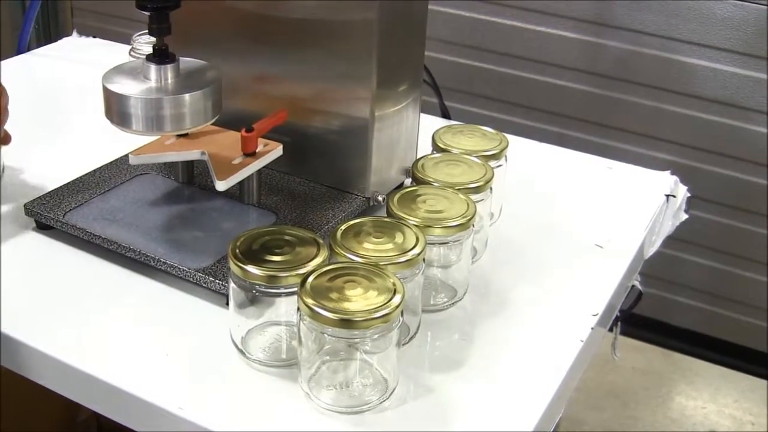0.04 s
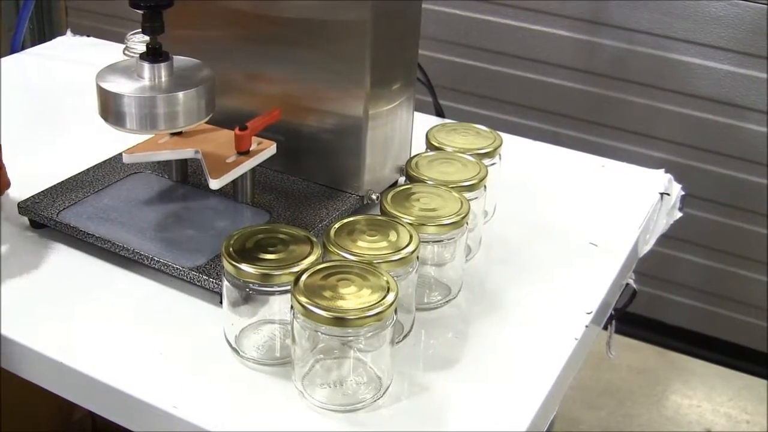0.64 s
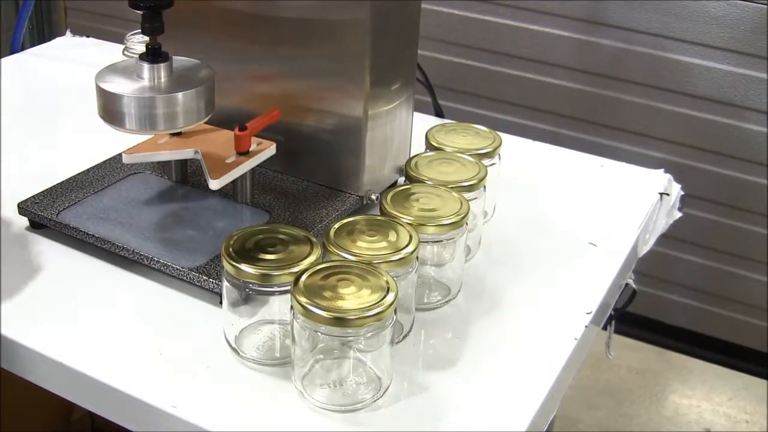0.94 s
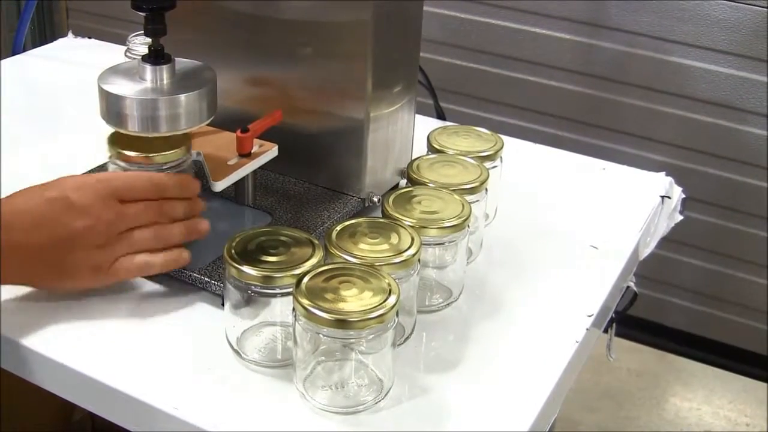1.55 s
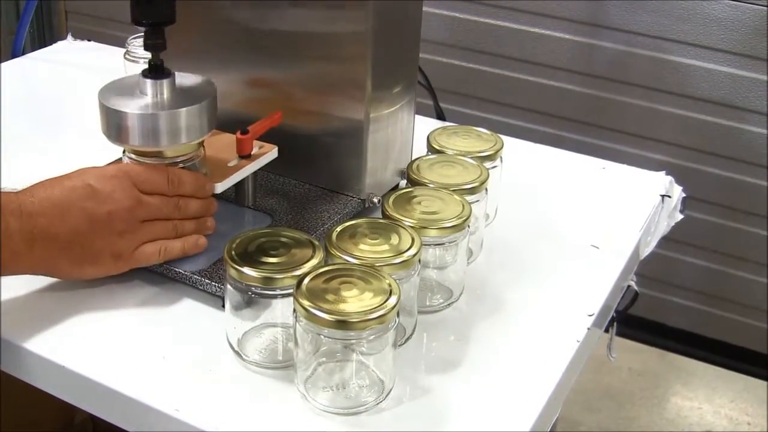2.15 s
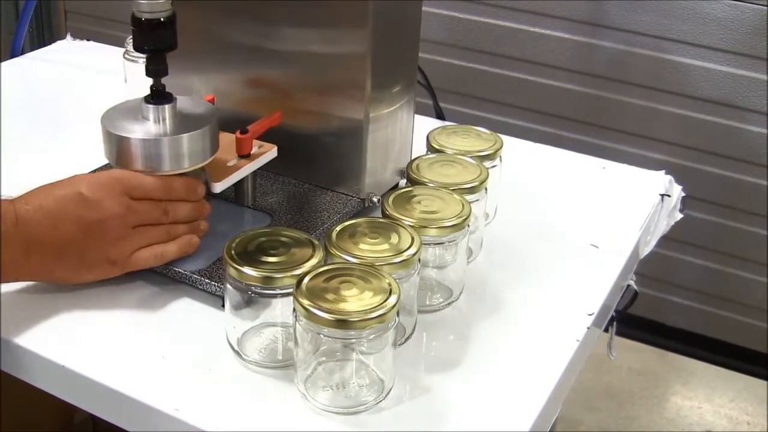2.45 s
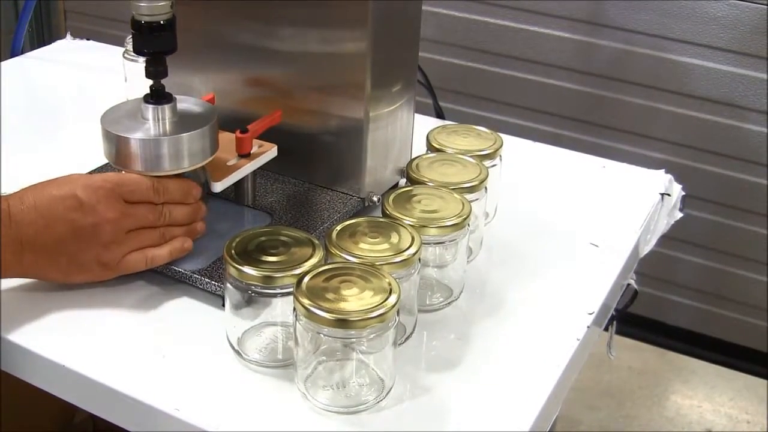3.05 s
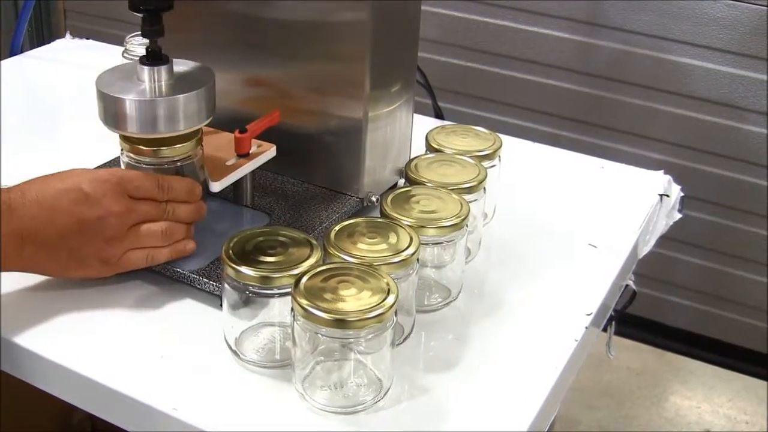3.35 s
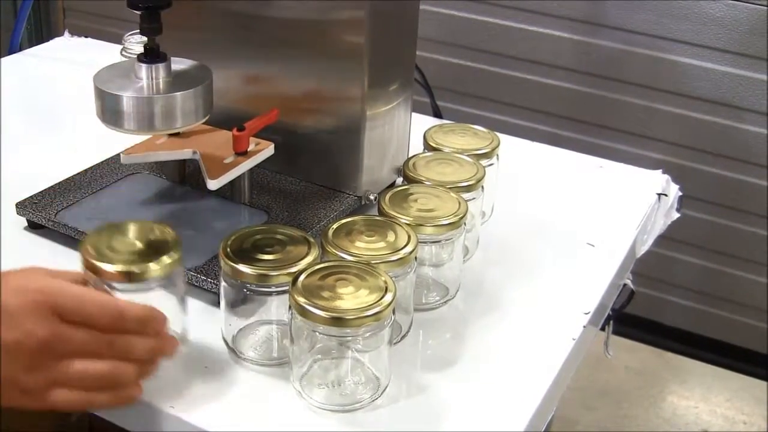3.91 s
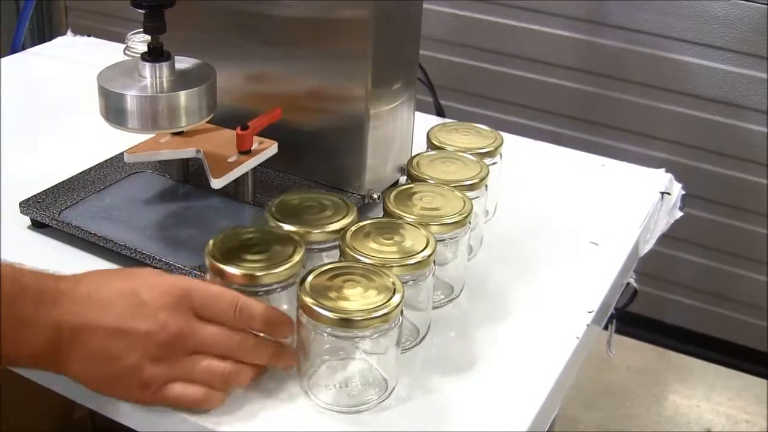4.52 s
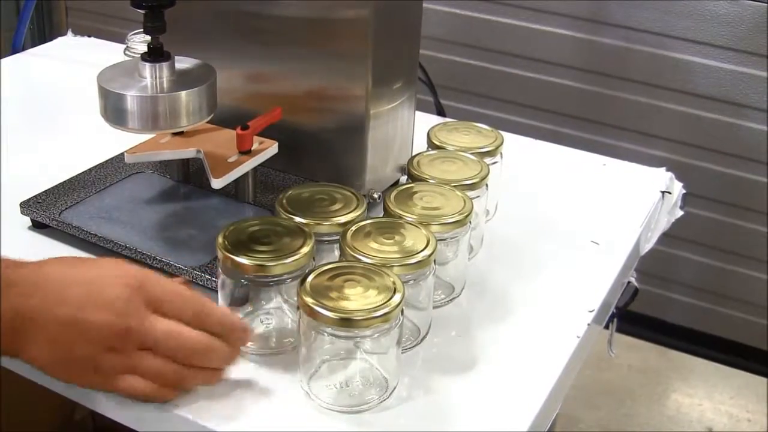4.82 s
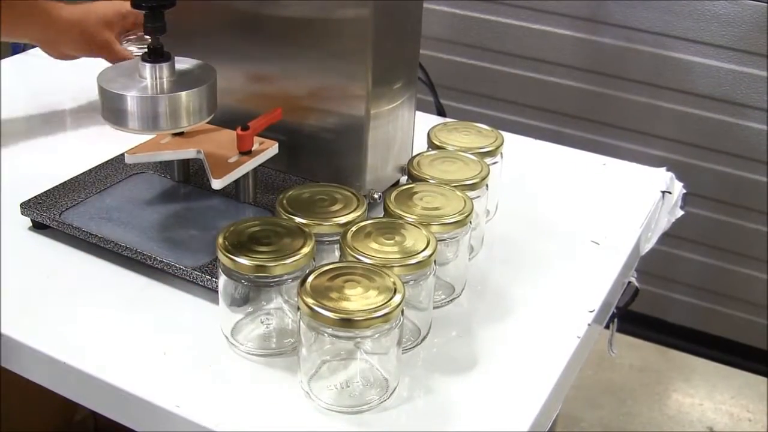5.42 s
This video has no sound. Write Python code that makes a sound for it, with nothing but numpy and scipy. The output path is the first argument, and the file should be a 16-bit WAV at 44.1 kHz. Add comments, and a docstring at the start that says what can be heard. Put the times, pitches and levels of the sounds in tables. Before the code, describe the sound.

Workshop ventilation hums softly throughout. In the first 0.6 seconds a metal lid taps lightly on a glass jar. At 1.5 seconds the jar bumps a ringing guide plate, and a capping machine's head clacks down. At 1.8 seconds a sharp tick and a brief metallic boom start the motor, which rises quickly to a high, hissing whine. Its pitch sags and it stalls with another boom around 2.4 seconds. From 2.5 to 3 seconds the slipping clutch makes a loud, fast, buzzing rattle. The head lifts with clacks around 3.2 seconds, followed by faint springy ticks and a ringing bump at 3.7 seconds. From 4.1 to 4.5 seconds the jar clinks onto the table and slides against other jars. One faint tap comes near 5.5 seconds. The machine and jar sound close and centred, with a short room echo.

```python
"""A tabletop capping machine: its motor whines up and bogs down as a jar's lid tightens, then its slip
clutch rattles until the head lifts with a clack. The steel column booms at start and stall.
Beforehand the glass jar is pushed against the guide and the chuck comes down on its lid. Afterwards
it is pulled out, set on the table and slid up to the others. Workshop ventilation hums behind."""
import sys
import numpy as np
from scipy import signal
from scipy.fft import rfft, irfft, next_fast_len
from scipy.io import wavfile
from scipy.ndimage import map_coordinates

SR = 44100
rng = np.random.default_rng(int(sys.argv[2]) if len(sys.argv) > 2 else 0)


def inscribe(sig):
    """Save sig as 16-bit PCM at rate SR to the path in sys.argv[1].

    A 1-D sig is mono; a 2-D sig holds one channel per row.
    Samples are clipped to [-1, 1] before scaling.
    """
    pcm = np.round(np.clip(np.atleast_2d(sig).T, -1, 1) * 32767)
    wavfile.write(sys.argv[1], SR, pcm.astype(np.int16))


N = 245637
TIME_S = np.arange(N) / SR
MOTOR_START_S, SLIP_START_S, SLIP_END_S = 1.79, 2.5222, 3.02

# Glass jar modes. Each row: frequency in Hz, relative level in dB, t60 in seconds.
JAR_MODES = [(555, -4.5, 0.086), (1080, -16, 0.098), (1240, -2, 0.073), (1570, 1.5, 0.063),
             (1760, -3, 0.068), (2050, -16, 0.082), (4700, -15, .04), (5770, -11, 0.035),
             (8030, -16, 0.038), (8150, -19, 0.035), (10800, -20, 0.025)]


def amp(db):
    """Decibels to gain."""
    return 10 ** (np.asarray(db) / 20)


def unit(x):
    """Scale to rms 1."""
    return x / np.sqrt(np.mean(x ** 2) + 1e-20)


def along(points, hz):
    """(Hz, value) points read on a log axis."""
    knots_hz, values = np.transpose(points)
    return np.interp(np.log(hz + 1), np.log(knots_hz + 1), values)


def wobble(rate_hz):
    """Smooth random curve, rate_hz knots a second."""
    knots = rng.standard_normal(int(N * rate_hz / SR) + 4)
    return map_coordinates(knots, [TIME_S * rate_hz])


def coloured(x, spectrum, size=4096):
    """Minimum-phase filter with a (Hz, dB) spectrum."""
    cepstrum = irfft(np.log(amp(along(spectrum, np.fft.rfftfreq(size, 1 / SR)))))
    cepstrum[1:size // 2] *= 2
    cepstrum[size // 2 + 1:] = 0
    return signal.fftconvolve(x, irfft(np.exp(rfft(cepstrum))))[:len(x)]


def noise(spectrum):
    """Coloured noise of rms 1."""
    return unit(coloured(rng.standard_normal(N), spectrum))


def tone(hz):
    """Sine of rms 1 on a pitch curve."""
    return np.sqrt(2) * np.sin(2 * np.pi * (np.cumsum(hz) / SR + rng.random()))


def fading(t, t60_s):
    """Exponential decay."""
    return np.exp(-np.log(1000) * t / t60_s)


def step(centre_s, ramp_s):
    """Smooth rise from 0 to 1."""
    return .5 + .5 * np.tanh((TIME_S - centre_s) / (2 * ramp_s))


def envelope(start_s, attack_s, hold_s, t60_s):
    """Linear attack; decay begins hold_s after the start."""
    t = TIME_S - start_s
    return np.clip(t / attack_s, 0, 1) * fading(np.maximum(t - hold_s, 0), t60_s)


def ringing(modes, t, scatter_db):
    """Damped modes of scattered strength and alternating sign."""
    return sum((-1) ** k * amp(db - scatter_db * rng.normal()) * fading(t, t60_s)
               * np.sin(2 * np.pi * hz * t) for k, (hz, db, t60_s) in enumerate(modes))


def add(track, start_s, sound):
    """Mix a sound into a track."""
    start = max(round(start_s * SR), 0)
    track[start:start + len(sound)] += sound[:N - start]


def blows(hits, colour, modes, crack_db, ring_db, knock_db, bright_db, ring_t60_s):
    """Each contact is a sharp crack and a dense clatter that leaves the object's modes ringing."""
    # Each hit: start in seconds, relative level, knock and brightness in dB, clatter t60 in seconds.
    # Each colour row: frequency in Hz, gain in dB.
    # Each mode: frequency in Hz, relative level in dB, t60 in seconds.
    track, t = np.zeros(N), np.arange(SR // 2) / SR
    for start_s, db, knock, bright, t60_s in hits:
        decay = fading(t, max(t60_s, .01)) + amp(crack_db) * fading(t, .0021)
        clatter = coloured(rng.standard_normal(len(t)) * decay, colour)
        ring = ringing(modes, t, scatter_db=3) * fading(t, ring_t60_s)
        low_db, high_db = knock + knock_db, bright + bright_db
        hardness = [(40, low_db - 15), (140, low_db), (450, low_db), (900, 0), (2500, 0), (7000, high_db)]
        strike = clatter / np.linalg.norm(clatter) + amp(ring_db) * ring / np.linalg.norm(ring)
        blow = coloured(strike, hardness)
        add(track, start_s, amp(db) * blow / np.std(blow[:SR // 100]))
    return track


def ventilation():
    """Steady air with wavering fan lines; the noise level ducks briefly, as under a gain control."""
    # Air spectrum and fan lines. Each row: frequency in Hz, relative level in dB.
    air_colour = [(15, -21), (25, -36), (96, -22.5), (152, -9), (188, -10.5), (221, -16.5), (289, -7),
                  (331, -12.5), (433, -10), (469, -12), (648, -9.5), (762, -11.5), (970, -11.5),
                  (3340, -25), (15500, -58)]
    fan_lines = [(236.9, -47), (290.7, -45), (441.4, -44.5), (581.4, -49), (1319, -54)]
    duck_db = -4 * np.exp(-((TIME_S - 3.74) / .16) ** 2)  # after the loud machine
    level = amp(-37.5 + duck_db + .45 * wobble(9.5))
    fan = sum(amp(db - 4.5 + 2.5 * wobble(3.875)) * tone(hz + 1.46 * wobble(5.3)) for hz, db in fan_lines)
    mid = level * noise(air_colour) + fan
    side = amp(-13.5) * level * noise(air_colour)
    return np.array([mid + side, mid - side])


def room(x):
    """Workshop echo; the treble dies first."""
    # Each row: frequency in Hz, t60 in seconds.
    decay_times = [(150, 0.33), (1000, 0.62), (4000, 0.37), (12000, 0.22)]
    hz, t, spectra = signal.stft(rng.standard_normal(SR), SR, nperseg=256)
    tail = signal.istft(spectra * fading(t, along(decay_times, hz)[:, None]), SR, nperseg=256)[1]
    return signal.fftconvolve(x, np.pad(tail, (SR // 200, 0)) / np.linalg.norm(tail))[:N]


def ticks():
    """Metallic ticks: one at the switch, then a springy train, weak and strong by turns."""
    # Switch tick: start in seconds, peak in dB, pitch in Hz.
    switch = (1.7794, -11.5, 11560)
    train_start_s, period_s, train_db, train_hz = 3.396, .061, -34.5, 8080
    train = [(train_start_s + k * period_s, train_db - (-1) ** k + 2 * rng.normal(), train_hz)
             for k in range(8)]
    track, t = np.zeros(N), np.arange(SR // 10) / SR
    for start_s, db, hz in [switch] + train:
        resonance = [(hz / 20, -50), (hz / 5, -6), (hz * .26, -28), (hz * .95, -20),
                     (hz, 0), (hz * 1.03, -20), (hz * 1.1, -28), (hz * 2, -55)]
        tick = coloured(rng.standard_normal(len(t)) * fading(t, .01), resonance)
        add(track, start_s, amp(db) * tick / np.abs(tick).max())
    return track


def lid_taps():
    """Jar and lid are handled at the table's edge; the lid rings."""
    # Columns as in blows().
    hits = [(0.038, -10.5, -15, -4, 0.047), (0.047, -6, -1.5, -10, 0.032), (0.054, -3.5, 0, -3, 0.036),
            (0.061, -6, -10, -18, 0.02), (0.082, -13, -7, -9, 0.032), (0.303, -2.5, -7, -21, 0.028),
            (0.309, -9, -2.5, -6, 0.037), (0.456, -18.5, -1.5, -22, 0.27), (0.530, -16.5, -11.5, -11, 0.11),
            (0.556, -17.5, -9.5, -21, 0.049), (0.607, -27.5, -33, -12.5, 0.019),
            (5.477, -23.5, -31, -16, 0.55)]
    colour = [(88, -40), (150, -27), (477, 0.5), (1320, -11), (1950, -19), (2270, -19.5), (2750, -22),
              (3400, -15.5), (6680, -35.5), (8410, -39), (11500, -35.5), (15000, -59)]
    modes = [(461, 5, 0.075), (848, 0, 0.045), (1275, -6.5, 0.1), (2267, -3, 0.096), (3480, -4, 0.14),
             (4000, -8.5, 0.054), (7200, -14, 0.022), (8300, -9.5, 0.028)]
    return blows(hits, colour, modes, crack_db=-13, ring_db=-4.5,
                 knock_db=9.5, bright_db=16, ring_t60_s=.48)


def guide_bumps():
    """The jar bumps the guide plate, which rings."""
    # Columns as in blows().
    hits = [(1.475, -12, -9, -17, 0.066), (1.483, -16.5, -33, -22, 0.081), (1.501, -9, -8.5, -20.5, 0.039),
            (3.718, -18, -12, -58, 0.091), (3.740, -5, -21.5, -27, 0.1), (3.764, -8, -21, -42, .09)]
    colour = [(88, -47), (150, -19.5), (649, -13.5), (818, -3), (1130, -20), (1730, -13.5), (2550, -24.5),
              (3400, -23.5), (3750, -34), (10800, -49), (15000, -60)]
    modes = [(587, -5.5, 0.13), (812.7, 6, 0.33), (1088, -10, 0.19), (1610, -25, 0.28), (1736, -8.5, 0.55),
             (1790, -18.5, 0.59), (2022, -16, 0.23), (3500, -13, 0.071)]
    return blows(hits, colour, modes, crack_db=-33, ring_db=1, knock_db=15, bright_db=23, ring_t60_s=1.2)


def jar_clinks():
    """The glass strikes the table and the other jars."""
    # Columns as in blows().
    hits = [(4.066, -1, -8, -24.5, 0.097), (4.087, -6.5, -14, -35, 0.11), (4.1115, -2, -22, -15.5, 0.028),
            (4.136, -8.5, -11, -19, .04), (4.1578, -3.5, -27, -18, 0.041), (4.171, -4.5, -25, -22, 0.025),
            (4.273, -0.5, -19, -25, 0.022), (4.2795, -2, -18, -15, 0.064), (4.29, -9, -24, -24, 0.032),
            (4.2975, -5, -23.5, -13, 0.061), (4.382, -14, -1, -26, 0.027), (4.398, -17, -11, 1, 0.081),
            (4.418, -18, -8, -14, .04)]
    colour = [(88, -62), (150, -24), (306, -17), (525, -6), (866, -11), (1350, -3.5), (2140, -10),
              (4460, -25.5), (5720, -22.5), (6550, -28), (10600, -32.5), (12900, -41), (15000, -65)]
    return blows(hits, colour, JAR_MODES, crack_db=-16, ring_db=-6,
                 knock_db=16.5, bright_db=16.5, ring_t60_s=.67)


def jar_slide():
    """The jar's base sticks and slips on the table in tiny grains that ring the glass."""
    # Each row: start in seconds, relative level in dB, hold and t60 in seconds.
    pushes = [(4.106, -25.5, 0.062, .12), (4.284, -19, 0.11, 0.63)]
    # Friction spectrum. Each row: frequency in Hz, gain in dB.
    friction_colour = [(60, -43), (200, -8.5), (350, -12), (560, -6), (750, -8.5), (1050, -7.5),
                       (1230, 1.5), (1420, -4.5), (2100, -13), (3300, -30.5), (5800, -25.5), (7200, -47),
                       (8100, -30), (9500, -43), (14000, -55)]
    grains_per_s, attack_s = 2600, .01
    grains = (rng.random(N) < grains_per_s / SR) * rng.standard_normal(N)
    glass = signal.fftconvolve(grains, ringing(JAR_MODES, np.arange(SR // 5) / SR, scatter_db=3))[:N]
    pressure = sum(amp(db) * envelope(s, attack_s, hold_s, t60_s) for s, db, hold_s, t60_s in pushes)
    return pressure * (amp(-2.5) * unit(coloured(grains, friction_colour)) + amp(-13) * unit(glass))


def head_clacks():
    """The head drops and lifts; chuck and column ring."""
    # Columns as in blows().
    hits = [(1.649, -4.5, -15, -36.5, 0.043), (1.674, -3.5, -20, -35, 0.044), (1.699, -15, -17, -53, 0.075),
            (1.790, -6.5, -8.5, -22, 0.17), (1.808, -9, -5, -25, 0.091), (3.118, -16.5, -13, -37, 0.049),
            (3.213, -9.5, -16, -33.5, 0.17), (3.229, -14, 3, -45, 0.13),
            (3.2595, -3.5, -15.5, -15.5, 0.066), (3.267, -7.5, -16.5, -32, 0.16)]
    colour = [(71, -62), (120, -7.5), (173, -2.5), (383, -9), (469, 4.5), (936, -4), (1240, -12.5),
              (1790, -6), (2590, -18), (4300, -15.5), (6330, -20), (9130, -22), (13400, -27), (15500, -44)]
    modes = [(469, 7.5, 0.1), (852, -3, 0.31), (1880, -19, 0.36), (1920, -17, 0.45), (3420, -15, 0.17),
             (5880, -15, 0.11), (8600, -20, 0.051), (11670, -45, 0.21)]
    return blows(hits, colour, modes, crack_db=-23, ring_db=-3.5,
                 knock_db=9, bright_db=16.5, ring_t60_s=.25)


def column():
    """The steel column booms at its own pitch at motor start and stall; a short low thud at the start."""
    # Each row: start in seconds, level in dB, hold and t60 in seconds.
    booms = [(1.804, -8.5, 0.028, 0.11), (2.437, -7, 0.023, 0.092), (2.479, -8.5, 0.03, 0.067)]
    # Thud spectrum. Each row: frequency in Hz, gain in dB.
    thud_colour = [(15, -14), (35, -13), (90, -11), (170, -11), (330, -1), (620, 8), (1250, -3.5),
                   (2500, -47)]
    resonance_hz, attack_s = 474, .0062
    swells = [amp(db) * envelope(s, attack_s, hold_s, t60_s) for s, db, hold_s, t60_s in booms]
    idle = amp(-36) * envelope(MOTOR_START_S, attack_s, SLIP_START_S - MOTOR_START_S, t60_s=.089)
    boom = np.max(swells + [idle], axis=0) * tone(resonance_hz + 9 * wobble(60))
    thud = envelope(MOTOR_START_S, attack_s=.016, hold_s=.031, t60_s=.058) * noise(thud_colour)
    return boom + amp(-13.5) * thud


def pawl_snaps(slip_hz):
    """At each clutch slip a tooth scrapes off and the pawl rings."""
    # Slips as the clutch lets go and runs out. Each row: start in seconds, relative level in dB.
    lone_slips = [(2.5098, -17), (3.0295, -15.5), (3.053, -15.5)]
    # Each row: frequency in Hz, relative level in dB, t60 in seconds.
    pawl_modes = [(3115, 3, 0.012), (3320, -1.5, 0.014), (3590, 8.5, 0.0037)]
    # Each row: frequency in Hz, gain in dB.
    scrape_colour = [(300, -43), (1000, -20), (2500, -9), (3150, -12.5), (4100, -10), (6100, -15.5),
                     (9500, -18), (12400, -13.5), (14000, -36), (15500, -52)]
    start, end = round(SLIP_START_S * SR), round(SLIP_END_S * SR)
    slip_count = np.floor(np.cumsum(slip_hz[start:end]) / SR)
    slips = [(i / SR, -16) for i in start + np.flatnonzero(np.diff(slip_count, prepend=-1))]
    t = np.arange(SR // 20) / SR
    scrape_shape = fading(t, .027) * (1 - fading(t, .006))
    ring = ringing(pawl_modes, t, scatter_db=0) * (1 - fading(t, .004))
    scrapes, rings = np.zeros(N), np.zeros(N)
    for start_s, db in slips + list(lone_slips):
        add(scrapes, start_s, amp(db + rng.normal()) * scrape_shape * rng.standard_normal(len(t)))
        add(rings, start_s + .00005 * rng.normal(), amp(db + 1.5 * rng.normal()) * ring)
    scrapes = coloured(scrapes, scrape_colour)
    return scrapes + amp(1) * np.std(scrapes) * unit(rings)


def clutch():
    """The train of slips snaps the pawl, makes the housing hum and drone, and rattles loose parts."""
    # Each row: time in seconds, slips per second.
    slip_rates = [(2.52, 92.5), (2.63, 92.3), (2.78, 91.3), (3.02, 90.7)]
    # Housing lines. Each row: multiple of the slip rate, relative level in dB.
    hum_lines = [(5, -6), (7, -18), (8, -8.5), (9, 1.5), (10, -5), (12, -13.5), (15, -20), (16, -13.5),
                 (18, 1), (19, -9), (23, -12)]
    # Each row: frequency in Hz, gain in dB.
    rattle_colour = [(80, -25), (170, -6), (320, -13), (480, 0.5), (850, 6), (1300, -5.5), (1800, 5),
                     (2600, -12), (4000, -18.5)]
    length_s, lag_s, drone_fade_db_per_s = SLIP_END_S - SLIP_START_S, .01, 30
    slip_hz = np.interp(TIME_S, *np.transpose(slip_rates))
    snaps = pawl_snaps(slip_hz)
    hum = unit(sum(amp(db + wobble(14) + wobble(90)) * tone(k * slip_hz) for k, db in hum_lines))
    drone = amp(-23.5 - drone_fade_db_per_s * np.maximum(TIME_S - SLIP_START_S, 0)) * tone(2 * slip_hz)
    build_up = envelope(SLIP_START_S + lag_s, attack_s=.062, hold_s=length_s - lag_s, t60_s=.11)
    rattle = noise(rattle_colour) * envelope(SLIP_START_S, attack_s=.0033, hold_s=length_s, t60_s=.41)
    return amp(19.5) * snaps + (amp(-18.5) * hum + drone) * build_up + amp(-24) * rattle


def gears(shaft_hz, speed, torque, stalled, age_s):
    """Teeth hiss in time with the shaft and sing near full speed; play between them smears the lines."""
    # Each row: multiple of the shaft rate, relative level in dB.
    mesh_lines = [(3, -35), (7, -38), (16, -35), (17, -31.5), (18, -47), (34, -34), (35, -42)]
    # Each row: frequency in Hz, gain in dB.
    hiss_colour = [(60, -34), (150, -6.5), (330, -17), (520, 1.5), (800, 0), (1400, -8.5), (2000, -1),
                   (2650, -5), (3300, 4), (4400, -10), (5900, -6), (6700, -3.5), (8300, -14), (10500, -8),
                   (13000, -10), (15500, -15)]
    lines = sum(amp(db + 1.2 * wobble(8.5) + 1.9 * wobble(70)) * tone(k * shaft_hz + 25 * wobble(200))
                for k, db in mesh_lines)
    hiss = unit(noise(hiss_colour) * amp(2 * tone(shaft_hz))) * speed ** .76
    hiss_gain = amp(-26.5 + 2.5 * torque - 12 * stalled)
    bedding_in = amp(-18.5 * np.exp(-age_s / .068))
    return bedding_in * (amp(-2) * lines * speed ** 12 + hiss_gain * hiss)


def motor():
    """The geared motor whines up, is braked as the thread catches and the lid seats, then stalls."""
    # Each row, from the fundamental up: relative level, change at the catch and change under torque
    # in dB, run-up exponent, slow swell in dB.
    partials = [(-13.2, 1.7, -3.5, 7, .8), (-27, -2, 11, 1, 3.5), (-27, 8.2, -.5, 5, 1.5),
                (-33, -8, 9, 12, 4), (-37, -9, -3, 12, 2)]
    start_hz, free_hz, run_up_s = 380, 996, .05
    catch_drop_hz, seat_drop_hz = 25, 515
    caught, torque = step(2.095, ramp_s=.014), step(2.282, ramp_s=.023)
    seated, stalled = step(2.415, ramp_s=.014), step(2.438, ramp_s=.002)
    age_s = np.maximum(TIME_S - MOTOR_START_S, 0)
    run_up = 1 - (1 - start_hz / free_hz) * np.exp(-(age_s / run_up_s) ** 1.5)
    speed = run_up - (catch_drop_hz * caught + seat_drop_hz * seated) / free_hz
    labour = 1 - speed  # unsteadies pitch and level
    whine_hz = free_hz * speed * (1 + .0025 * wobble(70) + .03 * labour * wobble(250))
    flutter_db = .7 + 4 * labour
    tilt_db = -6.5 * np.sqrt(seated)  # per partial, about the third
    whine = np.zeros(N)
    for k, (db, catch_db, torque_db, exponent, swell_db) in enumerate(partials, 1):
        level = amp(db + catch_db * caught + torque_db * torque + tilt_db * (k - 3))
        waver = amp(swell_db * wobble(18) + flutter_db * wobble(110))
        whine += level * waver * run_up ** exponent * tone(k * whine_hz)
    shaft_hz = whine_hz / 5
    running = envelope(MOTOR_START_S, attack_s=.004, hold_s=SLIP_START_S - MOTOR_START_S, t60_s=.03)
    return running * (whine * (1 - stalled) + gears(shaft_hz, speed, torque, stalled, age_s))


def scene():
    """Machine and jar straight ahead, the column nearly dry; echo and air give width."""
    hits = (amp(-10.5) * lid_taps() + amp(-7.5) * head_clacks() + amp(-8.5) * guide_bumps()
            + amp(-11) * jar_clinks() + jar_slide() + ticks() + clutch())
    drive, boom = motor(), column()
    mid = hits + drive + boom + room(amp(-9.5) * hits + amp(-16) * drive + amp(-19.5) * boom)
    side_echo = room(amp(-21.5) * hits + amp(-20.5) * drive + amp(-21) * boom)
    side = coloured(side_echo, [(200, -4), (500, -1.5), (2000, -1), (4000, 4), (12000, 6.5)])
    balance_db = [[.2], [-.2]]
    return np.array([mid + side, mid - side]) * amp(balance_db) + ventilation()


def record(dry):
    """Soft peak limit, then a brick-wall low-pass."""
    ceiling, top_hz = .95, 15700
    rounded = dry / (1 + np.abs(dry / ceiling) ** 6) ** (1 / 6)
    size = next_fast_len(N + SR // 4)
    passband = np.fft.rfftfreq(size, 1 / SR) < top_hz
    return irfft(rfft(rounded, size) * passband, size)[:, :N]


dry = scene()
out = record(dry)
inscribe(out)
```